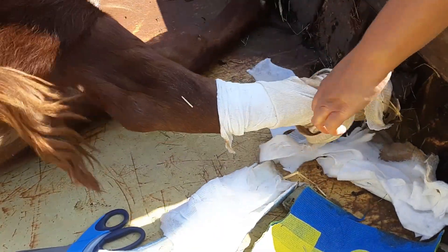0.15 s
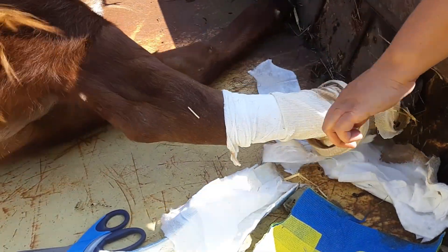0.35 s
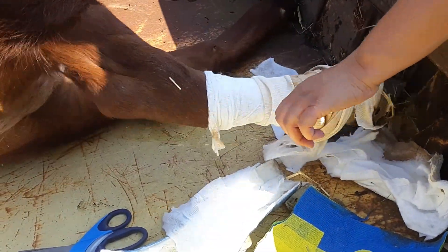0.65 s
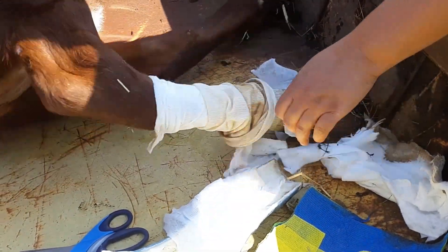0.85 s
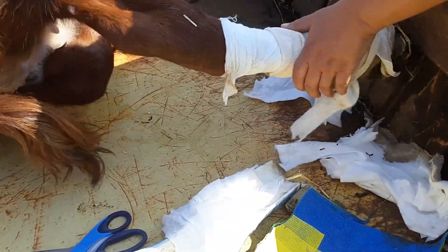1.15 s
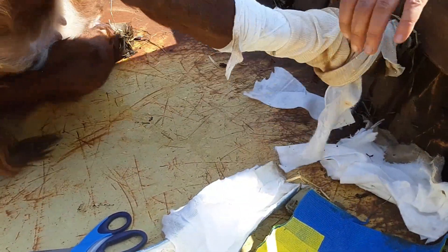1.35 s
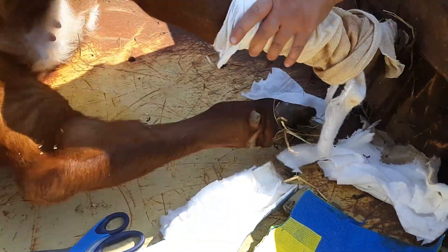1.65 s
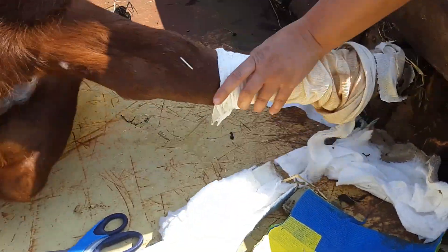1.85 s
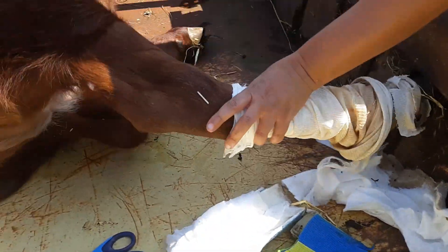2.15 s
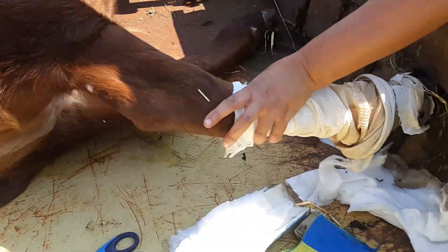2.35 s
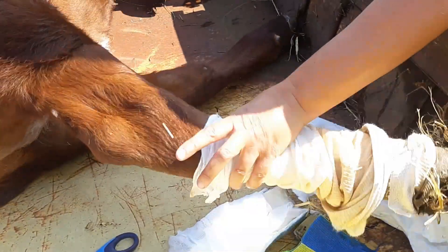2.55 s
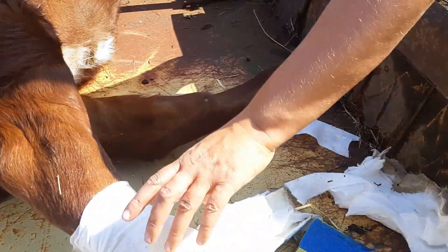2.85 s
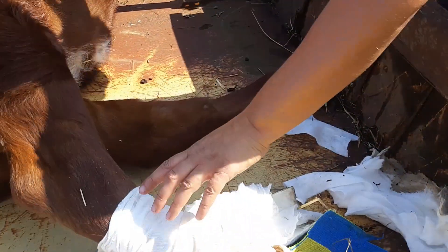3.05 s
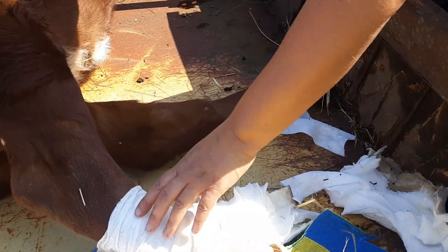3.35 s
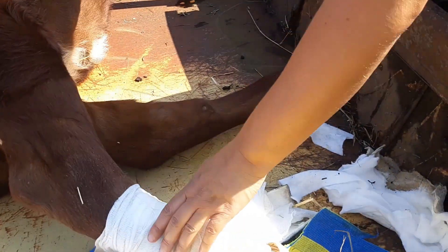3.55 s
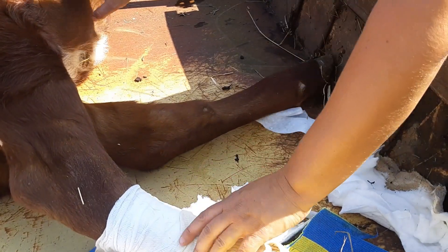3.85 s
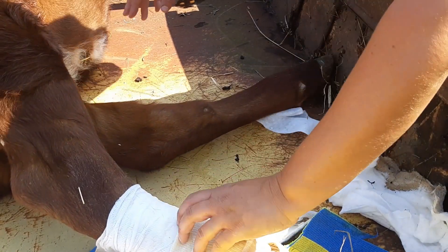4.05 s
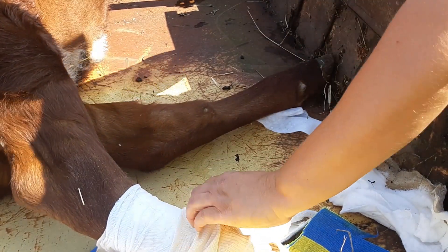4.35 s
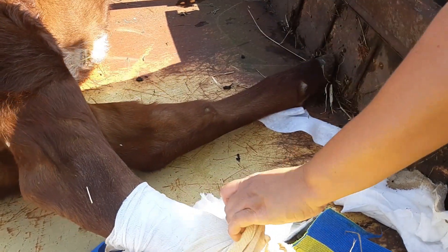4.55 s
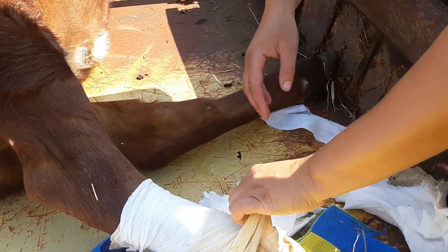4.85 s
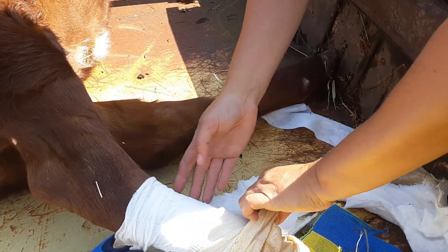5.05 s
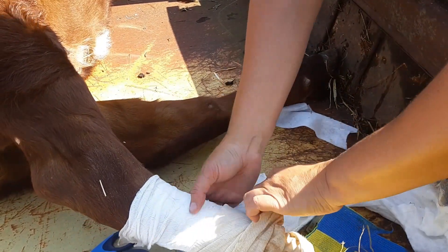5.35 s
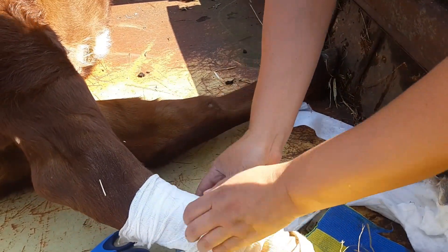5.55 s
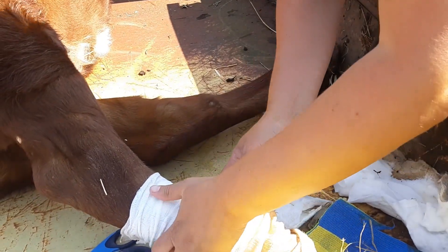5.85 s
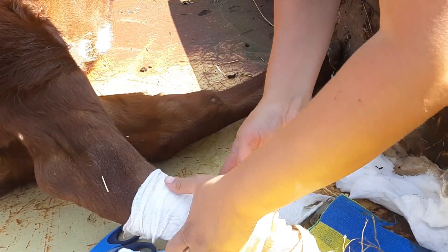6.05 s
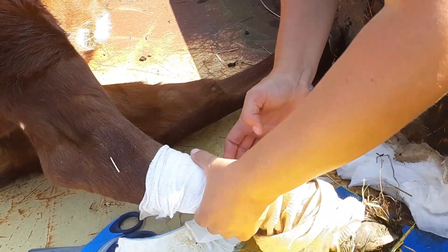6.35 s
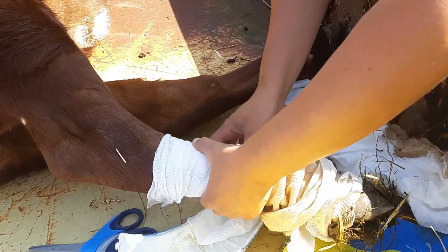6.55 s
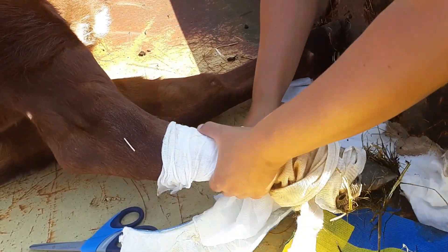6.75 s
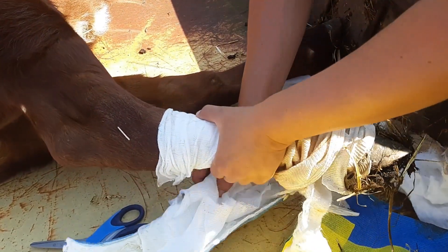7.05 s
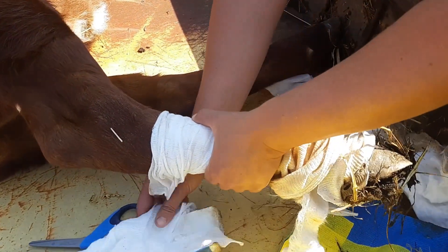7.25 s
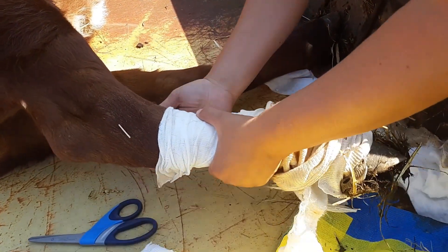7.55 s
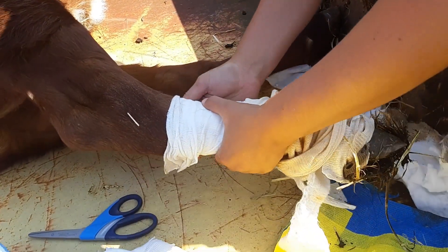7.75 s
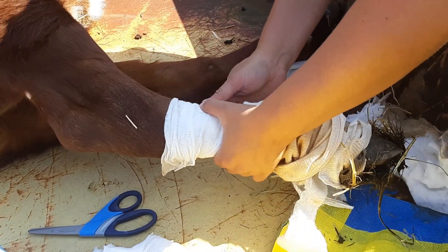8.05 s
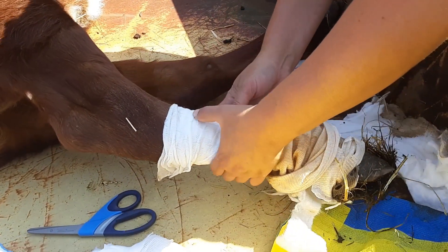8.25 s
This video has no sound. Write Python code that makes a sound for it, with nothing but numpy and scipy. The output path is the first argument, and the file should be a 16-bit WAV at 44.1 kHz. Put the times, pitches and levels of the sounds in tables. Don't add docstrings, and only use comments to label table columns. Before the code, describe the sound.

Outdoors, with a close microphone on a steel trailer deck. From 0 to 0.6 s, small thuds, straw scuffs and light rattles build up. At 0.7-0.9 s a body drop booms low and two hooves crack sharply. A hard panel slap follows at 1.0 s, with dull thumps and clatter to 1.4 s. After a short easing, the densest burst comes at 1.8-2.2 s: slaps, stamps, rattling latches and gritty scraping. Sliding continues, then a heavy wall kick lands at 2.75 s and the metal shakes out by about 3.2 s. From 3.2 to 6.8 s it is very quiet: faint airy hiss, soft gauze rustles, tiny dry ticks, a fading hum near 220 Hz and a faint nudge at 5.7 s. At 6.85 s a thud starts a weaker scuffle, with scraping, knocks at 7.2-7.35 s and a firm final blow at 7.4 s. Its ring fades under light rustling to 8.4 s.

```python
import sys
import numpy as np
from scipy import signal
from scipy.fft import rfft, irfft, next_fast_len
from scipy.io import wavfile
from scipy.ndimage import uniform_filter1d

SR = 44100
rng = np.random.default_rng(int(sys.argv[2]) if len(sys.argv) > 2 else 0)


def attenuation_scalar(level_db):
    decades = np.asarray(level_db, float) / 20
    return 10 ** decades


def store_pcm(level_fs):
    pcm = np.round(np.clip(level_fs, -1, 1) * 32767).astype(np.int16)
    wavfile.write(sys.argv[1], SR, np.atleast_2d(pcm).T)


N = 370881

# frequency in Hz, likeness from 0 to 1.
SAME = [(60, 1), (290, 0.95), (640, 0.78), (1200, 0.25), (16000, 0.36)]


def evened(x):
    return x / np.sqrt(np.mean(x ** 2) + 1e-20)


def read(points, hz):
    f, value = np.transpose(points)
    return np.interp(np.log(hz + 1), np.log(f + 1), value)


def add(mix, s, sound):
    part = mix[..., round(s * SR):][..., :sound.shape[-1]]
    part += sound[..., :part.shape[-1]]


def partner(first, other, same):
    return same * first + np.sqrt(1 - same ** 2) * other


def colour(x, spectrum, lo_hz=0, hi_hz=SR):
    lag_s = 0.0004
    size = next_fast_len(x.shape[1])
    hz = np.fft.rfftfreq(size, 1 / SR)
    left, other = rfft(x, size)
    late = np.exp(-2j * np.pi * np.maximum(hz - 900, 0) * lag_s)
    pair = np.array([left, partner(late * left, other, read(SAME, hz))])
    low_edge = 1 + (lo_hz / (hz + 1)) ** 12
    high_edge = 1 + (hz / hi_hz) ** 12
    band = 1 / np.sqrt(low_edge * high_edge)
    return irfft(pair * band * attenuation_scalar(read(spectrum, hz)), size)[:, :x.shape[1]]


def ports(x, balance):
    size = next_fast_len(N)
    half_db = .5 * read(balance, np.fft.rfftfreq(size, 1 / SR))
    return irfft(rfft(x, size) * attenuation_scalar([half_db, -half_db]), size)[:, :N]


def air():
    # frequency in Hz, level in dB.
    air_spectrum = [(24, -39.5), (40, -15.5), (106, 2), (209, -9), (329, -12.5), (433, -10), (790, -21),
                    (2570, -27.5), (4130, -11.5), (5050, -12), (5580, -21), (6490, -12.5), (7540, -30.5),
                    (14800, -25), (16000, -34)]
    air_db = -57
    return attenuation_scalar(air_db - 10.5) * evened(colour(rng.standard_normal((2, N)), air_spectrum))


def effort(column):
    # time in seconds, weight rolling on the deck in dB,
    # share borne by the hooves in dB, hide sliding in dB.
    struggles = [
        [(0.0, -38, -7.5, -57), (0.69, -42, -2, -59.5), (0.87, -20, -3.5, -43.5), (1.13, -28, 0.5, -35.5),
         (1.64, -42, -3.5, -62.5), (1.95, -23, 2, -31.5), (2.5, -36.5, -2, -86), (2.97, -40, 2.5, -52.5),
         (3.35, -55.5, -8.5, -78.5)],
        [(6.81, -49.5, -16, -84), (6.87, -37, 4.5, -51), (7.02, -39.5, 0, -55), (7.17, -42.5, 9, -43),
         (7.33, -31, -4.5, -44), (7.45, -25.5, -4, -64), (7.53, -32.5, -8.5, -63), (7.78, -48.5, -17, -80),
         (8.41, -63.5, -28, -92)],
    ]
    settle_db_per_s = {1: 12, 2: 15, 3: 13.5}[column]
    t = np.arange(N) / SR
    out = np.full(N, -140.)
    for rows in struggles:
        s, db = np.transpose(rows)[[0, column]]
        calming = settle_db_per_s * np.maximum(t - s[-1], 0)
        out = np.where(t >= s[0], np.interp(t, s, db) - calming, out)
    return out


def stir(length, db, rise_s=0.04, fall_db_per_s=143):
    t = np.arange(SR) / SR
    level = attenuation_scalar(np.c_[db] - fall_db_per_s * np.maximum(t - length, 0))
    return (level * np.minimum(t / rise_s, 1)) ** 2


def weight():
    # start in seconds, length in seconds,
    # level in dB, upper mode share in dB.
    shifts = [(3.549, 0.087, -57.5, -15), (4, 0.13, -59.5, -15.5), (4.416, 0.2, -55, -5.5),
              (4.95, 0.061, -60, -15.5), (5.086, 0.061, -61, 0), (5.696, 0.067, -53.5, -4),
              (5.898, 0.055, -74, 5.5), (6.1, 0.065, -69, 7.5), (6.26, 0.043, -60, -25),
              (6.55, 0.03, -68.5, -24.5), (6.71, .05, -65, 1)]
    boom_db = effort(column=1)
    power = attenuation_scalar([boom_db, boom_db + effort(column=2)]) ** 2
    for s, length, db, upper_db in shifts:
        add(power, s, stir(length, [db, db + upper_db]))
    return np.sqrt(power)


def rumble():
    # frequency in Hz, level in dB.
    deep_spectrum = [(18, -6), (30, -2), (60, 2), (90, -8), (130, -40)]
    rest_db, slope = -91, .72
    weight_db = 20 * np.log10(weight()[0] + attenuation_scalar(-66))
    deep_noise = evened(colour(rng.standard_normal((2, N)), deep_spectrum))
    return attenuation_scalar(rest_db + slope * (weight_db + 66)) * deep_noise


def deck_modes(count=84, strong_db=8):
    # frequency in Hz, level in dB, t60 in seconds.
    strong_modes = [(181.7, -20, 0.26), (259.5, 8, 0.35), (396, -17.5, 1.4), (458, -15.5, 0.68),
                    (512, -9, 0.2), (591, -27, 1),
                    (153.7, -5, 0.13), (214.4, 5, 1.1), (280.5, -4, 1.6), (361, -8.5, 1.1), (442.6, -2, 1.1),
                   (463, -7, 0.57), (542, 0.5, 0.63)]
    # frequency in Hz, level in dB.
    boom_spectrum = [(35, -58), (60, -36), (97, -13.5), (210, -6), (264, -9), (332, -10), (423, -2.5),
                     (539, 0.5), (706, -6), (1500, -26), (1950, -56.5), (3300, -120)]
    # frequency in Hz, t60 in seconds.
    ring_times = [(80, 1), (260, 0.8), (600, 0.77), (1500, 0.16)]
    weak_hz = np.geomspace(85, 1500, count) * rng.uniform(0.97, 1.02, count)
    weak_db = read(boom_spectrum, weak_hz) + 10 * np.log10(weak_hz / 200)
    weak_t60 = read(ring_times, weak_hz) * rng.uniform(.6, 1, count)
    named_hz, named_db, named_t60 = np.transpose(strong_modes)
    named_db = read(boom_spectrum, named_hz) + strong_db + .2 * named_db
    named_t60 = np.minimum(named_t60, read(ring_times, named_hz))
    hz = np.r_[weak_hz, named_hz]
    db = np.r_[weak_db, named_db][:, None]
    t60 = np.r_[weak_t60, named_t60][:, None]
    t = np.arange(SR) / SR
    return hz, attenuation_scalar(db - 60 * t / t60) * np.sin(2 * np.pi * hz[:, None] * t)


def struck(hz, rings, centre_hz, octaves, t60, far_db):
    a, b = rng.standard_normal((2, len(hz)))
    share = np.array([a, partner(a, b, read(SAME, hz))])
    share += .5
    share *= np.exp(-.5 * (np.log2(hz / centre_hz) / octaves) ** 2)
    t = np.arange(rings.shape[1]) / SR
    damping = attenuation_scalar(-60 * t / t60) + attenuation_scalar(far_db)
    fades = np.minimum(t / 0.0016, 1) * np.minimum((t[-1] - t) / 0.37, 1)
    return share @ rings * damping * fades


def deck():
    # start in seconds, peak in dB, centre of the boom in Hz, damping t60 in seconds.
    body_drops = [(0.25, -24.5, 201, 0.98), (0.289, -21, 230, 1), (0.369, -22, 189, 1),
                  (0.518, -25.5, 153, 0.072), (0.646, -22.5, 236, 1), (0.731, -5, 219.5, 0.88),
                  (0.862, -10, 190, .6), (1.103, -12.5, 198, 0.85), (1.149, -10, 207, 0.47),
                  (1.199, -7.5, 212, 0.17), (1.349, -24.5, 210, 0.35), (1.587, -25.5, 242, 0.99),
                  (1.781, -17, 170.2, 1), (1.901, -10, 192.5, 0.38), (2.082, -6, 257, 0.28),
                  (2.099, -6, 252, 0.24), (2.391, -23, 247, 0.99), (2.765, -17, 246, .5),
                  (2.959, -29, 174.6, 0.69), (4.39, -46.5, 129.9, .3), (5.725, -44, 143, 0.45),
                  (6.197, -47.5, 108, 0.48), (6.28, -41.5, 130, 0.26), (6.57, -50.5, 94.6, 0.87),
                  (6.64, -43, 110, 0.71), (6.789, -46, 94.5, 0.55), (6.861, -23.5, 135, 0.52),
                  (7.412, -15, 148, 0.46)]
    # start in seconds, peak in dB, centre of the ring in Hz,
    # damping t60 in seconds.
    hoof_hits = [(0.834, -4.5, 524, 0.1), (0.859, -5.5, 445, 0.6), (1.719, -23, 554, 0.93),
                 (2.008, -25, 455, 0.36), (2.697, -29, 370, 0.93), (2.756, -10, 720, 0.5),
                 (4.01, -58, 276, 0.46), (4.331, -57, 258, 0.4), (5.72, -44.5, 510, 0.65),
                 (6.1, -61, 440, 0.38), (6.575, -60.5, 665, 0.11), (7.209, -39, 458, 0.65),
                 (7.338, -20, 480, 0.4), (7.408, -15, 540, 0.33)]
    hz, rings = deck_modes()
    out = np.zeros((2, N))
    for blows, octaves in ((body_drops, 0.57), (hoof_hits, 0.77)):
        for s, db, centre_hz, t60 in blows:
            blow = struck(hz, rings, centre_hz, octaves, t60, far_db=-11.5)
            add(out, s, attenuation_scalar(db + 2.5) * blow / abs(blow).max())
    for level, centre_hz in zip(weight(), (180, 500)):
        for spot in range(3):
            sizes = attenuation_scalar(2.5 * np.minimum(rng.exponential(1, N), 3.5))
            bumps = sizes * (rng.random(N) < 400 / SR) * rng.choice([-1, 1], N)
            ring = struck(hz, rings[:, :SR // 2], centre_hz, 0.58, 0.12, far_db=-19.5)
            ring /= np.linalg.norm(ring[0])
            rolling = (level * evened(bumps))[None]
            out += attenuation_scalar(-4.5) * signal.oaconvolve(rolling, ring, axes=1)[:, :N]
    return signal.sosfilt(signal.butter(6, 92, "high", fs=SR, output="sos"), out)


def dragging():
    # start in seconds, length in seconds, level in dB,
    # dull share in dB, bright share in dB.
    gauze = [(3.6, 0.073, -82, 10.5, -12), (3.704, .04, -68, -17, -5), (3.996, 0.028, -67.5, -8.5, -7),
             (4.123, .1, -67, -5.5, -14), (4.349, 0.3, -60, -8.5, -20), (4.682, .2, -76, -3, -16),
             (4.904, 0.22, -65.5, -12, -17), (5.077, 0.071, -57.5, -5.5, -16),
             (5.33, 0.2, -65.5, -21.5, -18.5), (5.493, 0.16, -64, -7, -22), (5.695, 0.058, -62.5, -7, -26),
             (5.823, .16, -65, -7.5, -17.5), (6.084, 0.1, -58.5, -7, -19), (6.218, 0.056, -58, -5, -5.5),
             (6.453, 0.3, -70.5, -8.5, -12), (6.711, 0.038, -62, -8, -15), (7.548, 0.44, -65, -27, -16),
             (8.037, 0.32, -63.5, -24, -24)]
    # start in seconds, length in seconds,
    # level in dB, dull share in dB, bright share in dB.
    sweeps = [(0.132, 0.077, -52, 1, -3), (0.325, 0.1, -48, 2, 3), (0.762, 0.056, -36, -7, -5),
              (1.509, 0.11, -42.5, -2, -2), (1.654, 0.19, -43, 7.5, -26), (2.162, 0.2, -39.5, 0.5, -12),
              (2.414, 0.13, -53, 13, -8), (2.511, 0.37, -48, -0.5, -6.5), (2.84, .18, -53, -2, -7),
              (3.099, 0.14, -71.5, -1, 9.5), (1.765, .012, -36, -8, -8), (7.14, 0.21, -56, -3, -16)]
    slide_db = effort(column=3)
    dull_slide_db = slide_db + 8.5 + 0.23 * (slide_db + 41.5)
    power = attenuation_scalar([slide_db, dull_slide_db, slide_db - 13.5]) ** 2
    for s, length, db, dull_db, bright_db in gauze:
        add(power, s, stir(length, [db, db + dull_db, db + bright_db]))
    for s, length, db, dull_db, bright_db in sweeps:
        layers_db = [db, db + dull_db, db + bright_db]
        add(power, s, stir(length, layers_db, rise_s=.05, fall_db_per_s=601.5))
    return power


def rings_of_panels(narrow_db=3.5, wide_db=1.2):
    frames = N // 128 + 8
    a, b, c, d, narrow, wide = rng.standard_normal((frames, 257, 6)).T
    narrow = evened(uniform_filter1d(narrow, size=16, axis=1))
    wide = uniform_filter1d(wide, size=9, axis=0)
    wide = evened(uniform_filter1d(wide, size=24, axis=1))
    z = np.array([a + 1j * b, c + 1j * d]) * attenuation_scalar(narrow_db * narrow + wide_db * wide)
    return evened(signal.istft(z, nperseg=512, noverlap=384)[1][:, :N])


def clatter():
    # start in seconds, peak in dB, t60 in seconds, bright share over 7 kHz in dB.
    knocks = [(0.1251, -42.5, 1, -15), (0.2228, -28.5, 0.53, -9), (0.2901, -15.5, 0.17, -48.5),
              (0.614, -21.5, 0.35, -31.5), (0.6494, -22, 0.081, 0), (0.7306, -11.5, 0.35, -33.5),
              (0.8329, -7, 0.15, -11), (0.8574, -6.5, 0.16, -20), (0.8994, -13.5, 0.15, -3.5),
              (1.1403, -12, 0.39, -23), (1.2251, -13.5, 0.057, -35), (1.3323, -17, 0.37, -14.5),
              (1.894, -4.5, 0.19, -19), (2.0781, -7.5, 0.45, -22), (2.3839, -12.5, 0.25, -34),
              (6.84, -46.5, 0.49, -30)]
    rattles = [
        (0.2404, -28.5, 0.3, -6.5),
        (1.001, -3, 0.29, -35.5),
        (1.0294, -5, 0.07, -50.5),
        (1.5894, -20.5, 0.15, -12),
        (1.678, -16.5, 0.13, -23),
        (1.7788, -7, 0.17, -18.5),
        (1.8253, -12.5, 0.4, -21.5),
        (1.94, -3, 0.08, -17),
        (1.999, -4.5, 0.17, -13.5),
        (4.3389, -52, 0.2, -7),
    ]
    bumps = [
        (0.5141, -39, 0.29, -41),
        (2.7017, -34.5, 0.7, 0),
        (2.757, -15, 0.19, -22),
        (5.714, -46.5, 0.12, -31),
        (7.407, -28.5, 0.24, -19),
    ]
    # frequency in Hz, level in dB.
    grit_spectrum = [(410, -40), (700, 7), (875, 2.5), (958, 1.5), (1090, -1.5), (1250, 2), (2050, -3.5),
                     (2270, -6.5), (3370, -9.5), (4260, -8.5), (5150, -11.5), (5600, -21), (6000, -14),
                     (6480, -12.5), (7690, -21.5), (10700, -13), (16000, -15.5)]
    power = dragging()
    t = np.arange(SR // 2) / SR
    for rows, dull_db in ((knocks, 1), (rattles, -9), (bumps, 8.5)):
        for s, db, t60, bright_db in rows:
            rattle = attenuation_scalar(db - 11.5 - 60 * t / t60)
            rattle *= 1 + 0.14 * np.exp(-t / 0.0027)
            rattle *= np.minimum(t / .004, 1)
            add(power, s - .001, (attenuation_scalar([[0], [dull_db], [bright_db]]) * rattle) ** 2)
    grains = attenuation_scalar(0.69 * np.minimum(rng.exponential(1, N), 3)) * (rng.random(N) < 900 / SR)
    grain_decay = np.exp(-np.arange(400) / (0.0076 * SR))
    flicker = 1.9 + evened(signal.oaconvolve(grains, grain_decay)[:N])
    contacts = flicker * rings_of_panels()
    out = np.zeros((2, N))
    edges_hz = ((2829, 7650), (795, 2420), (6960, SR))
    for layer_power, (lo_hz, hi_hz) in zip(power, edges_hz):
        out += np.sqrt(layer_power) * evened(colour(contacts, grit_spectrum, lo_hz, hi_hz))
    return out


def shiver(hz, width_hz, length):
    t = np.arange(round(length * SR)) / SR
    a, b = rng.standard_normal((2, 2, len(t)))
    r = np.exp(-np.pi * width_hz / SR)
    slow = signal.lfilter([1], [1, -2 * r, r ** 2], a + 1j * b)
    ring = (slow * np.exp(2j * np.pi * hz * t)).real
    ring[1] = partner(ring[0], ring[1], read(SAME, hz))
    return t, evened(ring)


def chattering_latches():
    # start in seconds, rms in dB, pitch in Hz, width in Hz, length in seconds.
    chatters = [(.997, -22, 3400, 1300, .07), (.996, -26, 5800, 2000, 0.017), (1.02, -31, 6200, 1200, .04),
                (.398, -55, 9300, 200, .045), (2.752, -27, 740, 170, .07),
                (4.335, -54.5, 4600, 2600, 0.068), (3.6, -64, 365, 41, 0.1896), (4.01, -60.5, 355, 50, .12),
                (4.91, -69, 1260, 148, 0.017), (7.2, -30, 455, 18, 0.075), (7.405, -45, 4200, 380, 0.02),
                (7.65, -67, 2050, 120, 0.053), (7.73, -72, 2000, 100, .07), (5.71, -58, 1900, 210, .02),
                (.74, -20, 235, 25, 0.13), (2.955, -37, 180, 40, .085), (6.84, -56.5, 4600, 600, 0.11),
                (7.02, -51.5, 5100, 400, 0.36), (7.08, -54, 6400, 700, 0.32), (7.27, -52, 3700, 300, .1),
                (7.13, -45, 1300, 400, 0.26), (3.2, -63, 122, 8, .42), (3.54, -62, 95, 20, .09),
                (3.7, -73, 160, 8, .4), (4.3, -70, 270, 12, .25), (4.45, -60, 380, 27, .1),
                (4.46, -77, 42, 20, .25), (1.82, -26, 830, 120, .03), (2.11, -22, 560, 80, .05),
                (2.2, -35.5, 6800, 500, .015), (6.86, -60, 6500, 800, 0.22)]
    out = np.zeros((2, N))
    for s, db, hz, width_hz, length in chatters:
        t, ring = shiver(hz, width_hz, length)
        add(out, s, attenuation_scalar(db) * ring * signal.windows.tukey(len(t), .5))
    return out


def shaken_bars():
    # start in seconds, rms in dB, pitch in Hz, width in Hz, length in seconds.
    shakes = [(2.756, -28, 1700, 200, .06), (2.756, -33, 2500, 250, .04), (2.757, -23, 600, 150, .2),
              (2.4, -39, 1200, 200, .06), (2.93, -48, 780, 220, .45), (2.8, -52.5, 1650, 300, .6),
              (.998, -30, 2300, 700, 0.24), (7.408, -44.5, 1300, 500, 0.21), (5.714, -62, 1050, 80, 0.11),
              (5.716, -57, 560, 40, .15), (.515, -46, 1100, 540, .1), (1.331, -35.5, 2500, 900, 0.116),
              (1.895, -31, 2100, 500, 0.11), (2.15, -40.5, 1900, 650, .45), (1.14, -34, 2300, 500, .12),
              (7.15, -40, 1500, 300, 0.14), (1.779, -29, 520, 170, 0.23), (1.897, -24, 520, 150, .12),
              (2.002, -32, 1900, 700, .12)]
    out = np.zeros((2, N))
    for s, db, hz, width_hz, length in shakes:
        t, ring = shiver(hz, width_hz, length)
        add(out, s, attenuation_scalar(db + 7 - 40 * t / length) * ring * np.minimum(t / .003, 1))
    return out


def hoof_cracks():
    # start in seconds, peak in dB, pitch in Hz.
    cracks = [
        (.835, -11, 900),
        (.857, -10.5, 900),
        (1.19, -9, 400),
        (1.208, -10, 400),
        (1.897, -10, 900),
        (2.083, -7, 600),
        (2.758, -7, 800),
        (2.775, -10.5, 700),
        (7.408, -20, 800),
    ]
    out = np.zeros((2, N))
    t = np.arange(600) / SR
    for s, db, hz in cracks:
        crack = np.cos(2 * np.pi * hz * t + .19) * np.minimum(t / .0002, 1) * np.exp(-1.2 * hz * t)
        add(out, s - .0005, attenuation_scalar(db - 1.5) * crack[None])
    return out


def loose_metal():
    out = chattering_latches() + shaken_bars() + hoof_cracks()
    deep = signal.sosfilt(signal.butter(2, 60, fs=SR, output="sos"), out)
    return out - .5 * deep


def hum():
    # time in seconds, pitch in Hz, level in dB.
    hum_path = [(2.9, 230.9, -25), (3.03, 234, -41), (3.09, 242, -74), (3.26, 218, -59.5),
                (3.31, 218.2, -61.5), (4.19, 219.3, -58.5), (5.2, 220.7, -69.5), (5.61, 217.5, -81),
                (5.7, 230, -74)]
    # start in seconds, level in dB, pitch in Hz, t60 in seconds.
    lingering = [
        (7.41, -38, 463, 1.21),
        (7.48, -50.5, 361, 2.5),
    ]
    t = np.arange(N) / SR
    s, path_hz, path_db = np.transpose(hum_path)
    hz = np.interp(t, s, path_hz)
    db = np.interp(t, s, path_db)
    sounding = np.clip((t - s[0]) / 0.17, 0, 1) * np.clip((s[-1] - t) / 0.19, 0, 1)
    out = np.sqrt(2) * attenuation_scalar(db) * sounding * np.sin(2 * np.pi * np.cumsum(hz) / SR)
    t = t[:SR]
    for start, db, hz, t60 in lingering:
        add(out, start, attenuation_scalar(db - 60 * t / t60) * np.sin(2 * np.pi * hz * t))
    return out


def ticks():
    # start in seconds, peak in dB, pitch in Hz.
    snaps = [(3.2525, -57, 7000), (3.2695, -52, 6500), (3.31, -61, 8000), (3.56, -63, 1230),
             (3.9055, -57, 6500), (4.0085, -42, 6300), (4.2235, -46, 6200), (4.3395, -49, 5500),
             (4.92, -62, 8300), (5.962, -49, 5000), (5.992, -50, 4900), (6.0955, -43, 4900),
             (6.1465, -47, 4700), (6.243, -49, 4450), (6.2675, -45, 5200)]
    out = np.zeros((2, N))
    t = np.arange(600) / SR
    for s, db, hz in snaps:
        snap = rng.standard_normal((2, 600)) * np.exp(-t / 0.0031)
        snap += .7 * snap[0]
        band_hz = [0.67 * hz, min(1.5 * hz, .45 * SR)]
        snap = signal.lfilter(*signal.butter(2, band_hz, "band", fs=SR), snap)
        add(out, s, attenuation_scalar(db - 1.5) * snap / abs(snap).max(1, keepdims=True))
    return out


def scene():
    # frequency in Hz, left minus right in dB.
    near_balance = [(60, -3.5), (110, -2), (200, -1), (380, -3.5), (700, -1.5), (1290, -4.5), (2380, -5.0),
                    (4400, -14.5), (8120, 1), (15000, -2)]
    far_balance = [(60, -5.5), (110, -5.5), (200, -4), (380, -8), (700, 1), (1290, -13), (2380, -14.5),
                   (4400, -22.5), (8120, -7.5), (15000, -4)]
    near = deck() + hum() + clatter() + loose_metal()
    far = air() + ticks()
    return ports(near, near_balance) + ports(far, far_balance) + rumble()


def band_limit(x):
    return signal.sosfilt(signal.butter(12, 16970, fs=SR, output="sos"), x)


def record(dry):
    mix = 1.15 * np.tanh(dry / 1.15)
    lowpass = signal.firwin(255, 16000, window=("kaiser", 8), fs=SR)
    mix = signal.oaconvolve(mix, lowpass[None], "same")
    return band_limit(mix)


dry = scene()
out = record(dry)
store_pcm(out)
```